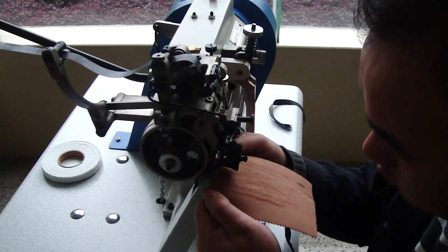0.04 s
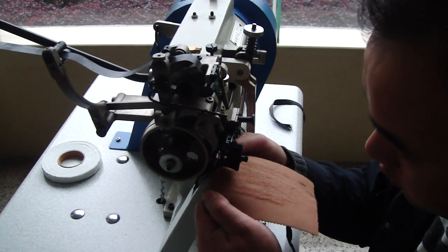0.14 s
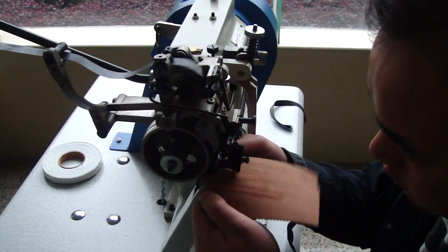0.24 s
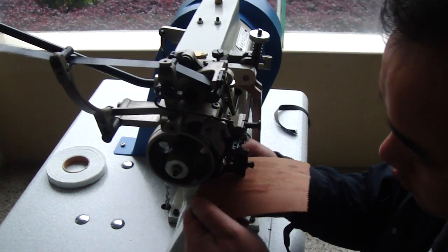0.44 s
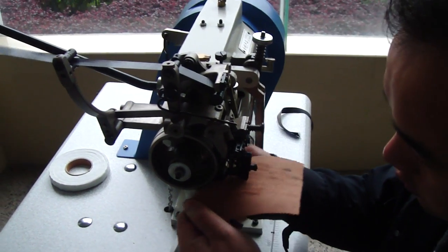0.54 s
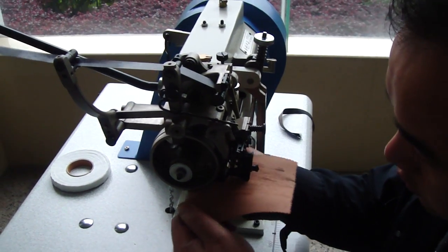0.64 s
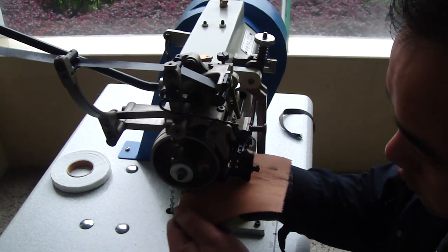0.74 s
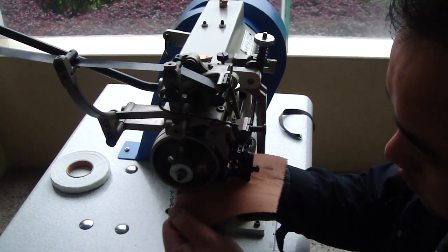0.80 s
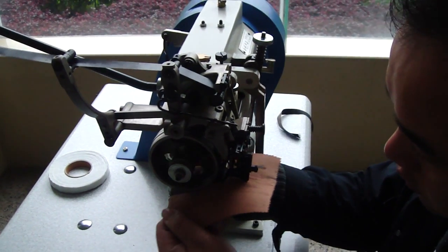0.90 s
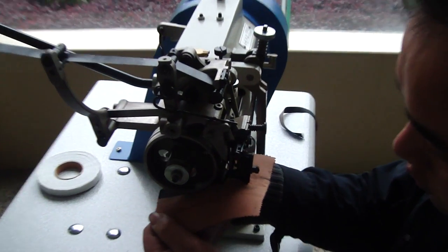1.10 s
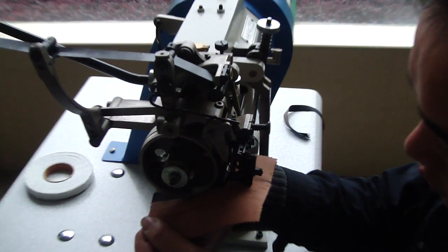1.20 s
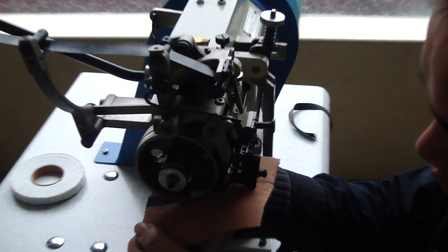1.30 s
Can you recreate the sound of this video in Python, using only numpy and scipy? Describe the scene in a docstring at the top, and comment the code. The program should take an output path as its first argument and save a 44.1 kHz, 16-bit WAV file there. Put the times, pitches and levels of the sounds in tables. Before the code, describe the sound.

A bench machine feeding leather runs briefly, heard close up indoors over a faint motor hum. Loose parts knock lightly at first. From 0.2 seconds its gears rise into a metallic rattle with short squeaks, and the loudest snap comes at 0.35. From 0.6 the rattle fades as the machine slows, with sharp clicks spreading further apart until 1.1, leaving a soft whir by 1.3 seconds.

```python
"""In a workshop, a bench strap-cutting machine is run up for a moment, then slows as leather is fed through.
The motor hums underneath, loose parts knock, and friction makes single resonances sing.
Gear-tooth contacts drive the metal frame into forced vibration, heard as a rattle.
The mechanism gives sharp snaps, impacts on heavily damped modes, that come further apart as it slows;
the loudest overload the microphone."""
import sys
import numpy as np
from scipy import signal
from scipy.fft import rfft, irfft
from scipy.io import wavfile
from scipy.ndimage import uniform_filter1d

SR = 44100
rng = np.random.default_rng(int(sys.argv[2]) if len(sys.argv) > 2 else 0)


def generate_wav(sig):
    """Save sig (samples, or channels by samples) to the path in sys.argv[1] as 16-bit PCM at SR."""
    pcm = np.round(np.clip(np.atleast_2d(sig).T, -1, 1) * 32767).astype(np.int16)
    wavfile.write(sys.argv[1], SR, pcm)


N = 59535
TIME, FREQS = np.arange(N) / SR, np.maximum(np.arange(N // 2 + 1) * SR / N, 1)


def from_db(db):
    """Amplitude ratio of a level in decibels."""
    return 10 ** (np.asarray(db) / 20)


def unit_rms(x):
    """Normalisation to unit mean power."""
    return x / np.sqrt(np.mean(x ** 2) + 1e-20)


def spectrum(rows, column=1):
    """Interpolation of a table column over logarithmic frequency."""
    rows = np.array(rows)
    return np.interp(np.log(FREQS), np.log(rows[:, 0]), rows[:, column])


def colour(x, gain):
    """Linear filtering: the spectrum is multiplied by a gain."""
    return irfft(rfft(x) * gain, N)


def ring(force, hz, t60):
    """Damped resonator: a unit impulse starts a decaying sinusoid of amplitude 1."""
    r, w = from_db(-60 / (t60 * SR)), 2 * np.pi * hz / SR
    return signal.lfilter([.5, 0, -.5], [1, -2 * r * np.cos(w), r * r], force + 1e-18)


def drift(hz):
    """Low-pass noise: a slow fluctuation of unit rms."""
    return unit_rms(colour(rng.standard_normal(N), 1 / (1 + (FREQS / hz) ** 2)))


# Sound field at the two channels: f/Hz, correlation, left minus right level/dB
STEREO_FIELD = [(100, 0, 2.5), (400, 0.54, 1.5), (1010, 0.67, 3), (2400, 0.8, 2.5), (3980, 0.73, 0.5),
                (6000, 0.32, -3), (7960, 0.012, -1.5), (11000, 0, 0)]


def spread(pair):
    """Partial coherence: two independent signals mix into left and right, most alike in the midrange."""
    correlation, pan_db = np.clip(spectrum(STEREO_FIELD), -.98, .98), spectrum(STEREO_FIELD, 2)
    mid, side = colour(pair[0], np.sqrt(1 + correlation)), colour(pair[1], np.sqrt(1 - correlation))
    return np.array([colour(mid + side, from_db(pan_db / 2)), colour(mid - side, from_db(-pan_db / 2))])


# Room noise: f/Hz, relative spectral density/dB
ROOM_NOISE = [(25, -44), (70, -23), (125, -15), (170, -6), (320, 1.5), (600, -4.5), (2000, -21),
              (10000, -15)]
# Motor partials: f/Hz, level/dB
HUM_PARTIALS = [(160, -63.5), (199, -65), (297, -54.5), (398, -55.5), (781, -63), (1130, -61)]
# Gain on both: t/s, gain/dB
BACKGROUND_GAIN = [(0, 4), (.4, -2), (1.15, -3.5), (1.33, 3)]


def motor_and_room_noise():
    """Random amplitude and phase modulation makes the motor's partials waver over dull room noise."""
    hum = 0
    for hz, db in HUM_PARTIALS:
        amplitude = from_db(db) * np.sqrt(2) * (1 + .71 * drift(hz=16))
        hum += amplitude * np.sin(2 * np.pi * hz * TIME + .52 * drift(hz=23))
    air = spread(colour(rng.standard_normal((2, N)), from_db(spectrum(ROOM_NOISE))))
    gain = from_db(np.interp(TIME, *np.transpose(BACKGROUND_GAIN)))
    return gain * (hum + from_db(-44) * unit_rms(air))


# Modes of thin steel parts: f/Hz, initial level/dB
STEEL_MODES = [(3321, -41.5), (3555, -41.5), (4670, -48)]


def steel(decay_t60_s=.69):
    """Exponential decay: thin parts, already ringing, fade unevenly as narrow bands of noise."""
    out = 0
    for hz, db in STEEL_MODES:
        band = ring(rng.standard_normal((2, N + SR)), hz, t60=.2)[:, SR:]  # steady after 1 s
        out += from_db(db - 60 * TIME / decay_t60_s) * spread(unit_rms(band))
    return out / np.sqrt(2)


# Taps of loose parts: t/s, relative level/dB, spectral tilt/(dB per octave)
KNOCKS = [(.002, -33, -4), (.0305, -25.5, 0.5), (.111, -35, -3.5), (0.131, -41, -5), (0.15, -33.5, -2.5)]
# Modes they excite: f/Hz, T60/s, gain/dB
KNOCK_MODES = [(1520, 0.042, -7), (1810, 0.024, 6), (2150, .015, -1), (2870, 0.014, -4), (3305, .2, -10),
               (3450, 0.15, -17), (4650, 0.21, -12), (5030, 0.02, 0.5), (5850, 0.011, -1),
               (7110, 0.014, -1.5), (9100, .01, -4.5)]


def knocks(contact_s=.002, pivot_hz=2000):
    """Impact excitation: loose parts tap the frame, and harder taps favour the higher modes."""
    out = 0
    for hz, t60, mode_db in KNOCK_MODES:
        envelope = 0
        for t, db, tilt_db in KNOCKS:
            strength = from_db(db + tilt_db * np.log2(hz / pivot_hz))
            envelope += strength * (TIME >= t) * np.exp(-abs(TIME - t) / contact_s)
        force = envelope * rng.standard_normal((2, N)) / np.sqrt(contact_s * SR)
        out += from_db(mode_db) * ring(force, hz, t60)
    return spread(out)


# Rubbed resonances: centre t/s, half-duration/s, f/Hz, T60/s, level/dB
FRICTION_TONES = [(0.294, .065, 2620, .05, -19), (0.305, .06, 2760, .08, -27),
                  (0.312, 0.046, 3320, 0.036, -25), (.26, 0.14, 7540, .02, -31),
                  (0.446, 0.07, 550, 0.48, -40.5), (0.43, 0.088, 1000, .1, -35),
                  (.556, .04, 4670, 0.51, -21), (1.3, .04, 3000, .5, -42), (0.623, .08, 781, 0.43, -39)]


def singing():
    """Frictional excitation: a rubbed resonance swells into a wavering tone and fades."""
    out = 0
    for t, half_s, hz, t60, db in FRICTION_TONES:
        analytic = signal.hilbert(unit_rms(ring(rng.standard_normal(N), hz, t60)))
        tone = analytic.real / np.sqrt(1 + abs(analytic) ** 2)  # limits the amplitude
        swell = np.cos(np.pi / 2 * np.clip((TIME - t) / half_s, -1, 1)) ** 3
        out += from_db(db) * swell * tone / np.sqrt(np.average(tone ** 2, weights=swell ** 2))
    return spread([out, 0 * out]) / np.sqrt(2)


# Rate of tooth contacts: t/s, f/Hz
MESH_RATE = [(0, 69.8), (.16, 112), (.23, 143), (.28, 168), (.45, 224), (.7, 190), (1.0, 123), (1.35, 78)]
# Rubbing between contacts: t/s, force relative to a contact
RUBBING = [(0, 1.0), (.165, .17), (.235, .22), (.29, .7), (.4, 1.0), (1.35, 1.0)]


def tooth_force(jitter=.015, scatter_db=1.3, decay_s=.0024):
    """Gear meshing: the force envelope is one decaying pulse per tooth on top of continuous rubbing."""
    rate = np.interp(TIME, *np.transpose(MESH_RATE))
    teeth = np.cumsum(rate * np.clip(1 + jitter * drift(hz=60), .1, 2)) / SR
    strength = from_db(scatter_db * rng.standard_normal(N))[teeth.astype(int)]
    age = (teeth % 1) / rate
    return np.interp(TIME, *np.transpose(RUBBING)) + strength * np.exp(-age / decay_s)


# Broadband response of the frame: f/Hz, relative spectral density/dB (driven, coasting)
FRAME_SPECTRUM = [(100, -19, -40), (270, -15.5, -8.5), (466, -8, -4.5), (970, -7.5, -3), (1596, -6.5, -5.5),
                  (1950, 2.5, 0), (2740, 3.5, 0.5), (2980, -4, -2.5), (3240, 2.5, -1.5), (4400, -3.5, -4.5),
                  (5550, -5.5, -0.5), (6160, -1.5, -2), (6700, -6, -7), (7500, -7.5, -12.5),
                  (8960, -4.5, -7), (11200, -12.5, -11.5)]
# Its modes: f/Hz, T60/s, level/dB re the broadband part (driven, coasting)
FRAME_MODES = [(594.2, 0.45, -21.5, -25.5), (776.2, 0.24, -25, -20.5), (1130.4, .12, -17.5, -18),
               (1437, 0.071, -24, -18), (1710, 0.21, -16, -20.5), (2389, 0.13, -11.5, -15.5),
               (2448, 0.36, -11.5, -12), (2620, 0.12, -15.5, -16.5), (2745, 0.064, -7, -11.5),
               (3290, 0.024, -13, -23), (3616, .06, -18, -14.5), (4140, 0.029, -13.5, -35),
               (4672, 0.3, -17.5, -16), (4930, 0.02, -17, -11.5), (5430, 0.088, -18, -13),
               (5890, 0.06, -16.5, -14), (7545, 0.021, -10, -13.5)]


def frame_vibration(force, release_s=.56, crossfade_s=.11, low_cut_hz=154):
    """Forced vibration: tooth contacts shake the frame, whose spectrum shifts as the drive lets go."""
    slowing = np.clip((TIME - release_s) / crossfade_s + .5, 0, 1)
    grit = force * rng.standard_normal((2, N))
    low_cut = 1 / (1 + (low_cut_hz / FREQS) ** 4)
    driven = unit_rms(colour(grit, from_db(spectrum(FRAME_SPECTRUM, 1)) * low_cut))
    coasting = unit_rms(colour(grit, from_db(spectrum(FRAME_SPECTRUM, 2)) * low_cut))
    body = driven * (1 - slowing) + coasting * slowing
    for hz, t60, driven_db, coasting_db in FRAME_MODES:
        mode = np.sqrt(force) * ring(force * rng.standard_normal((2, N)), hz, t60)
        body += unit_rms(mode) * from_db(driven_db + (coasting_db - driven_db) * slowing)
    return spread(body)


# Envelope of the rattle: t/s, level/dB before the band trims (bass, middle, treble)
RATTLE_ENVELOPE = [(0, -41, -39.5, -45.5), (0.08, -39, -44.5, -46.5), (0.14, -39, -39.5, -44),
                   (0.2, -32.5, -28.5, -29.5), (0.249, -31, -24, -22), (0.285, -27, -16, -18),
                   (0.34, -27, -18, -18.5), (0.4, -29, -19.5, -15), (0.48, -26.5, -16.5, -17.5),
                   (0.54, -30.5, -19.5, -17), (0.589, -35, -25.5, -24), (0.71, -37, -25.5, -24),
                   (0.83, -37.5, -30, -27), (0.98, -37.5, -28.5, -26.5), (1.07, -40.5, -34.9, -35.5),
                   (1.16, -42.5, -37, -33.5), (1.25, -43, -39.2, -39), (1.35, -43, -43.5, -41.0)]


def gear_rattle(crossovers_hz=(1788, 4030), trims_db=(0, -1.5, -1)):
    """Band envelopes: the frame's power rises with the run-up and falls as the gears slow."""
    body = frame_vibration(tooth_force())
    bass, below_treble = (1 / (1 + (FREQS / hz) ** 10) for hz in crossovers_hz)
    times, *levels = np.transpose(RATTLE_ENVELOPE)
    out = 0
    for gain, db, trim_db in zip((bass, below_treble - bass, 1 - below_treble), levels, trims_db):
        band = colour(body, gain)
        running_rms = np.sqrt(uniform_filter1d(np.mean(band ** 2, axis=0), size=2200))
        out += band / running_rms * from_db(np.interp(TIME, times, db) + trim_db)
    return out


# Modes of the snapping mechanism: f/Hz, T60/s, gain/dB (left, right)
SNAP_MODES = [(3330, 0.0099, -14.5, -13), (4060, 0.0059, -13.5, -10), (5050, 0.0075, -8.5, -5),
              (5892, 0.0078, -4.5, 0.5), (6304, 0.0057, -6, -6), (7280, 0.0055, -9.5, -10.5),
              (9010, 0.0054, -14, -9), (10520, 0.0049, -12.5, -8.5)]


def snap_ring(force, low_db, main_db):
    """Modal superposition: heavily damped modes of alternating sign ring for a few milliseconds."""
    tints_db = [low_db] * 2 + [main_db] * 4 + [0] * 2
    out = 0
    for k, (hz, t60, left_db, right_db) in enumerate(SNAP_MODES):
        gain = from_db(np.array([[left_db], [right_db]]) + tints_db[k])
        out += (-1) ** k * gain * ring(force, hz, t60)
    return out


# Snaps: t/s, relative level/dB, low-mode gain/dB, main-mode gain/dB, scrape gain/dB
SNAPS = [(0.3476, 4, 5, -2, -15), (0.4595, -7.5, 3, 4, -14), (.4710, -3.5, 5, 3, -14),
         (0.4741, -11.5, -8, 7, -18), (0.522, -6.5, 12, 7.5, -10), (0.5516, -11.5, 0, -12, -3),
         (0.5913, -1, 2, 10, -12), (.6133, -6.5, 15, 7, -4), (0.6491, -1.5, 1.5, 5, -12),
         (0.6915, -1.5, 6, 2.5, -9), (0.7221, -4, 4, -2, -14), (0.7662, -0.5, -9, 10.5, -17),
         (0.8065, -0.5, -1, 7, -17), (0.8592, -0.5, 7, 15, -12), (0.9251, -4.5, 3, -0.5, -9),
         (0.9934, -6.5, 9, 1.5, -5), (1.0558, -9.5, 7.5, -2.5, -2), (1.1262, -7.5, -2, -6, -7)]


def snaps(grit_s=.0011, crack_s=.0013, scrape_s=.0017, gain_db=-2.5, low_cut_hz=950):
    """Impulsive excitation: a brief scrape leads into a hard, gritty strike with a broadband crack."""
    out = np.zeros((2, N))
    lead_s = .004
    age = np.arange(1500) / SR - lead_s
    for t, db, low_db, main_db, scrape_db in SNAPS:
        grit, friction = rng.standard_normal((2, 2, len(age)))
        force = .15 * grit * (age > 0) * np.exp(-abs(age) / grit_s)
        force[:, np.argmin(abs(age))] += 1  # the strike itself
        hit = snap_ring(force, low_db, main_db)
        hit /= np.sqrt(np.mean(hit[:, (age > 0) & (age < .002)] ** 2))
        crack = grit[::-1] * np.maximum(age, 0) / crack_s * np.exp(1 - abs(age) / crack_s)
        scrape = np.diff(friction, prepend=0) * np.exp(-abs(age) / scrape_s)
        snap = hit + from_db(scrape_db) * scrape + from_db(-12.5) * crack
        start = int((t - lead_s) * SR)
        out[:, start:start + len(age)] += from_db(db + gain_db) * snap
    return colour(out, 1 / (1 + (low_cut_hz / FREQS) ** 2))


def reverberation(x, t60=.15):
    """Diffuse reflection: convolution with a decaying noise tail, different in each ear."""
    tail = rng.standard_normal((2, N)) * from_db(-60 * TIME / t60) * (TIME > .003)
    return signal.fftconvolve(x, tail / np.sqrt(np.sum(tail ** 2) / 2), axes=1)[:, :N]


def dip(start_s=.351, depth_db=-8.5, hold_s=.013, recover_s=.018):
    """Attenuation: the level dips briefly after the first snap."""
    shape = np.interp(TIME - start_s, [-.001, 0, hold_s, hold_s + recover_s], [0, 1, 1, 0])
    return from_db(depth_db * shape)


def scene():
    """Superposition: all sources add and share the dip; only the snaps reverberate."""
    hits = snaps()
    machine = gear_rattle() + singing() + steel() + knocks() + motor_and_room_noise()
    return dip() * (machine + hits + from_db(-13.5) * reverberation(hits))


def record(dry, overload=.8, stopband_hz=11700):
    """Saturation: the microphone rounds off the peaks, then a steep low-pass cuts the top."""
    clipped = dry / (1 + (dry / overload) ** 6) ** (1 / 6)
    return signal.sosfiltfilt(signal.cheby2(14, 42, stopband_hz, fs=SR, output="sos"), clipped)


dry = scene()
out = record(dry)
generate_wav(out)
```